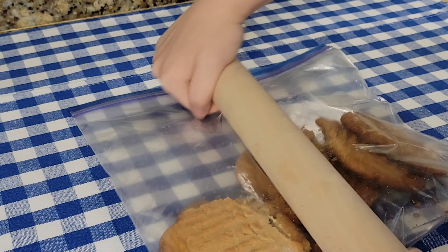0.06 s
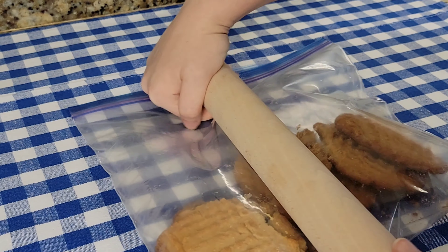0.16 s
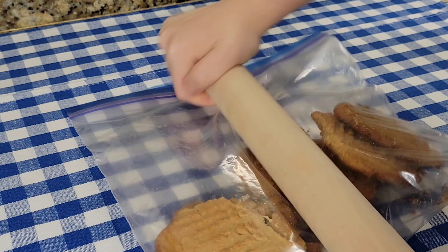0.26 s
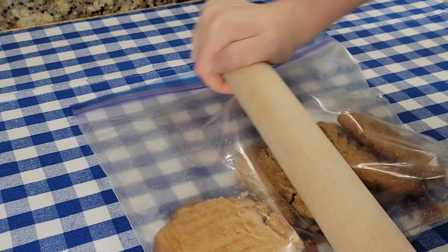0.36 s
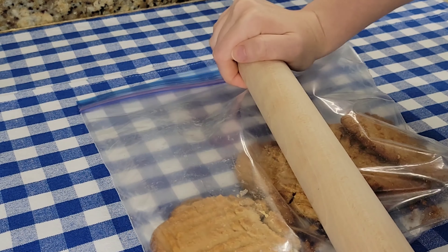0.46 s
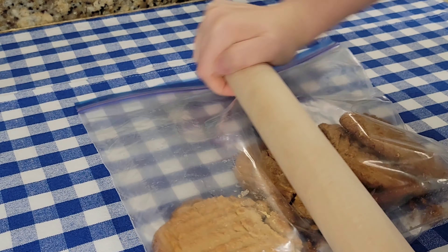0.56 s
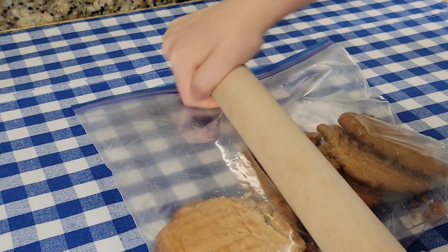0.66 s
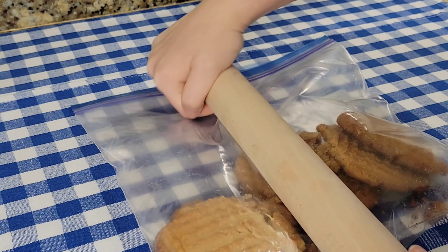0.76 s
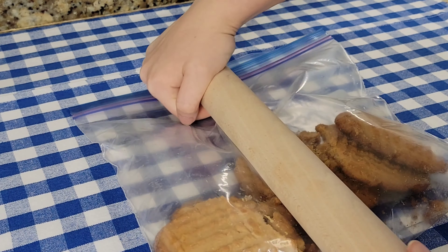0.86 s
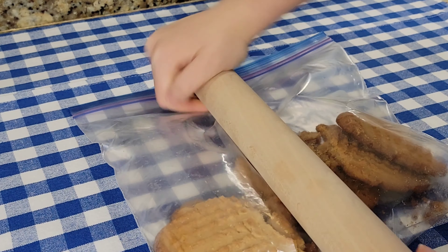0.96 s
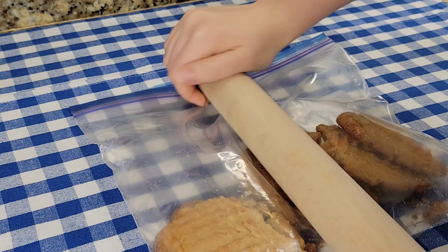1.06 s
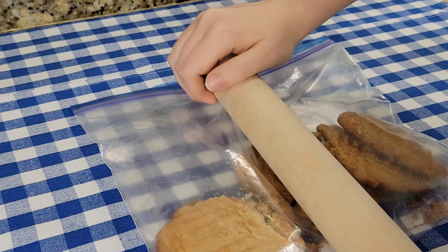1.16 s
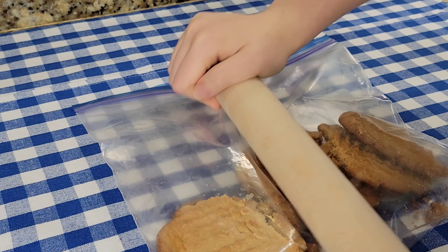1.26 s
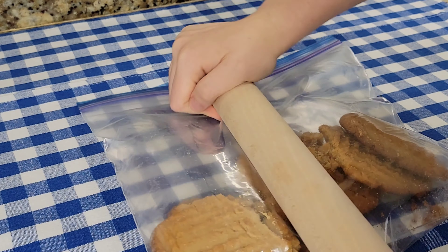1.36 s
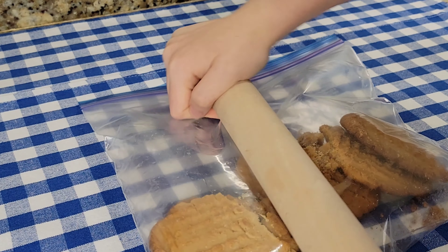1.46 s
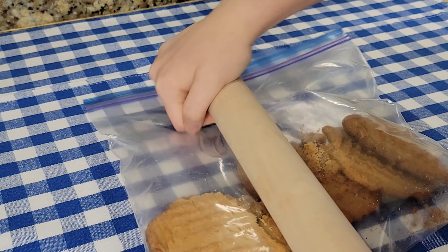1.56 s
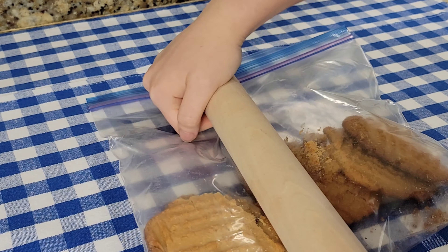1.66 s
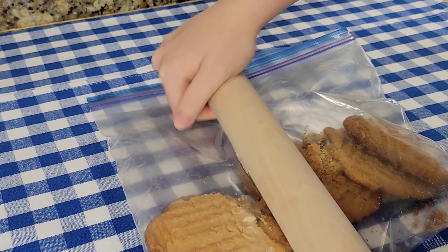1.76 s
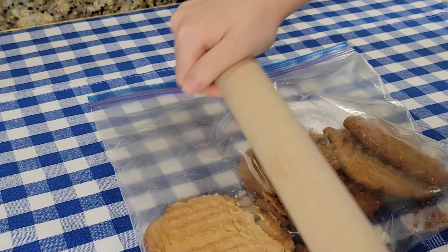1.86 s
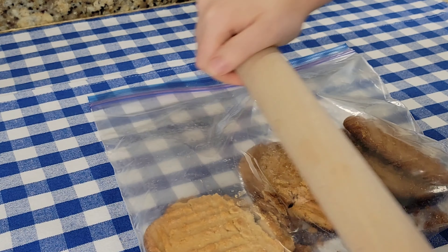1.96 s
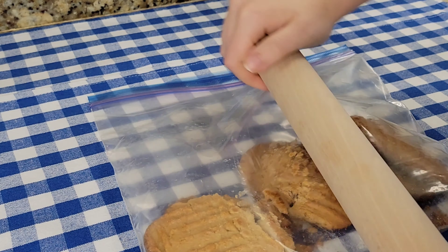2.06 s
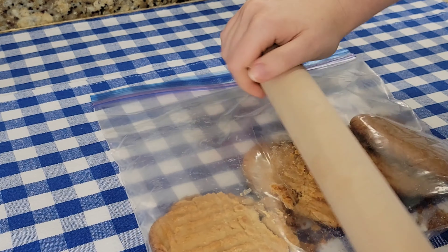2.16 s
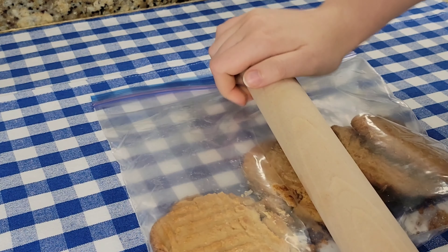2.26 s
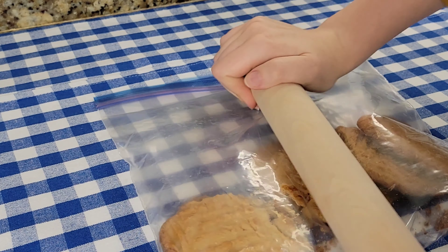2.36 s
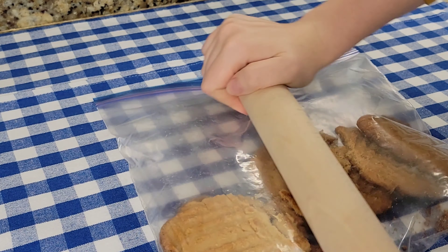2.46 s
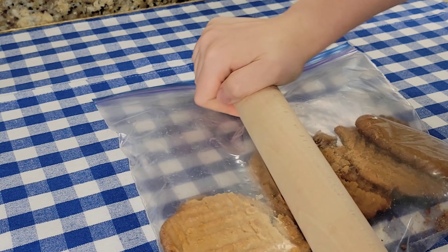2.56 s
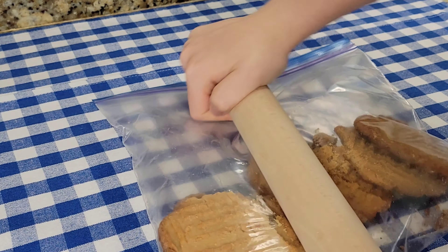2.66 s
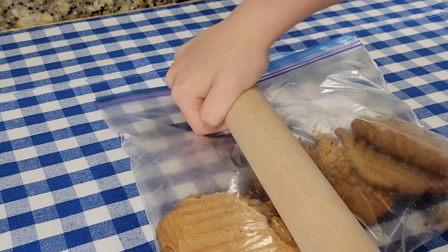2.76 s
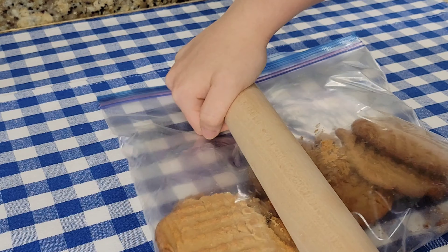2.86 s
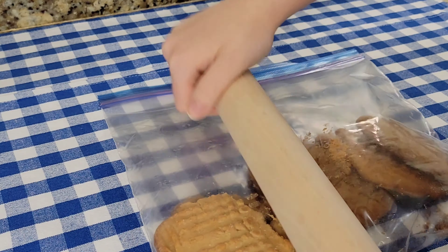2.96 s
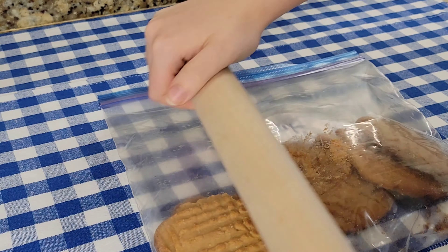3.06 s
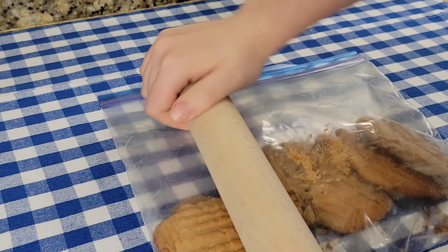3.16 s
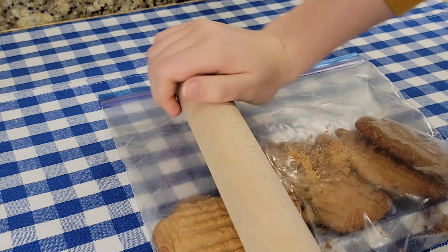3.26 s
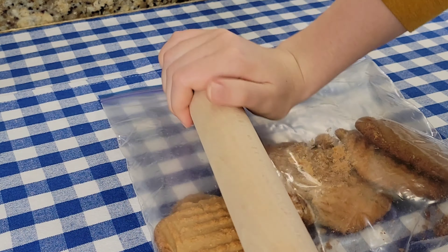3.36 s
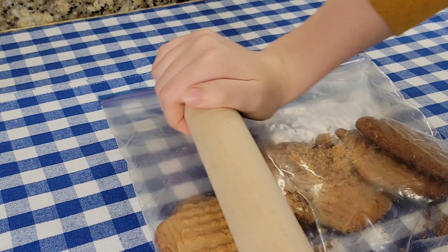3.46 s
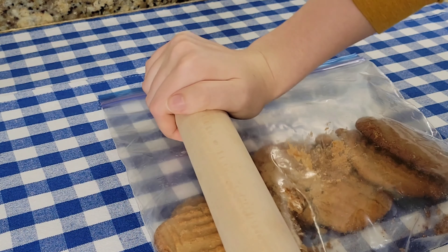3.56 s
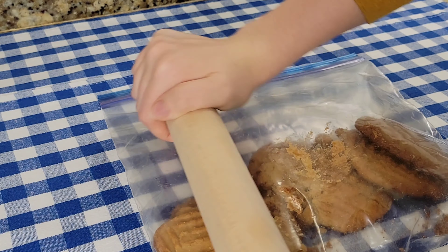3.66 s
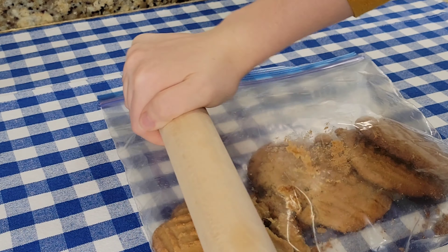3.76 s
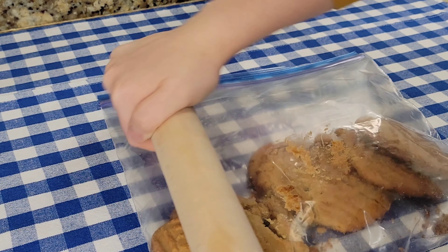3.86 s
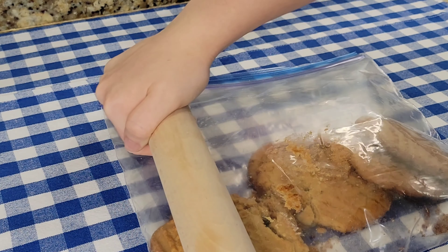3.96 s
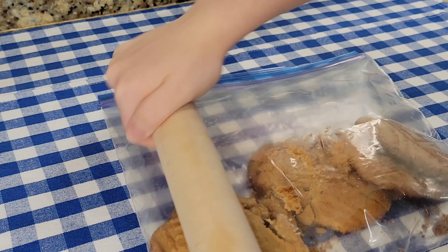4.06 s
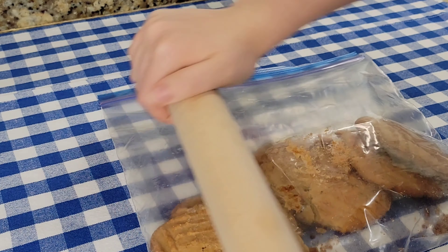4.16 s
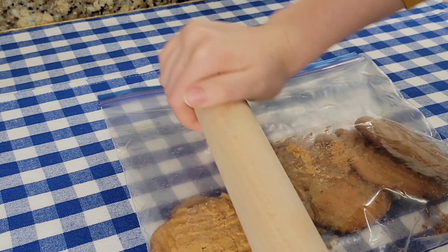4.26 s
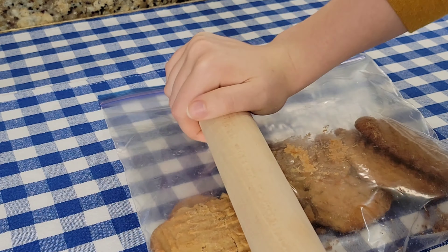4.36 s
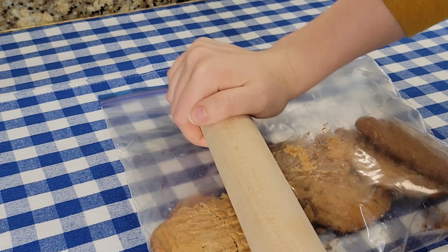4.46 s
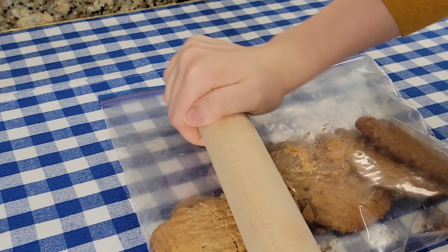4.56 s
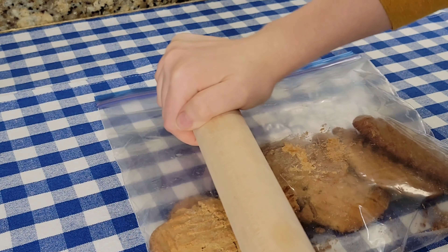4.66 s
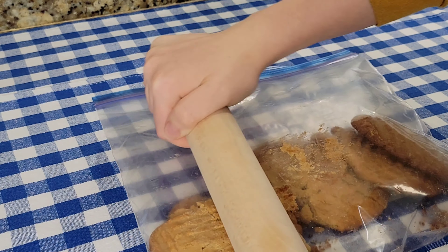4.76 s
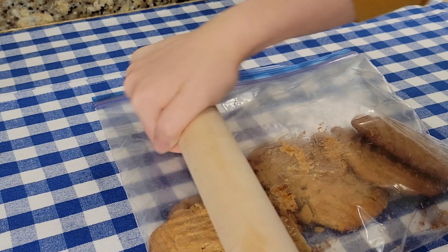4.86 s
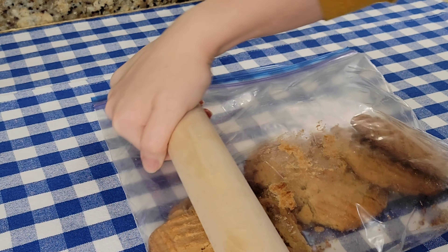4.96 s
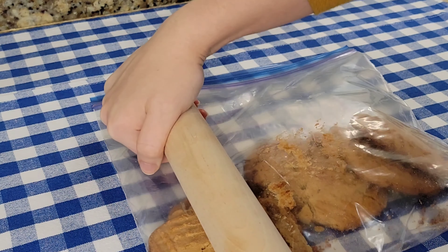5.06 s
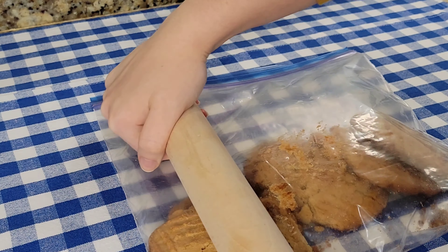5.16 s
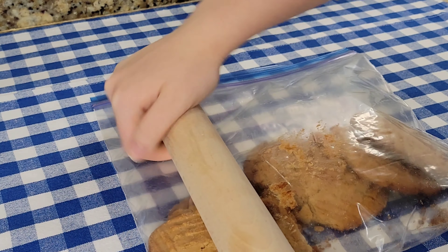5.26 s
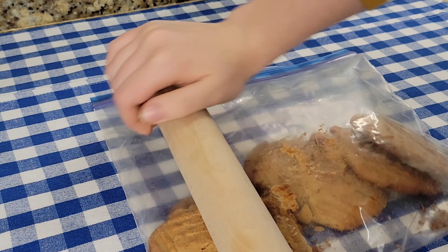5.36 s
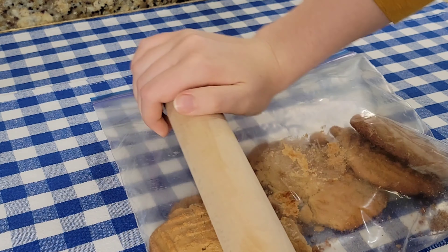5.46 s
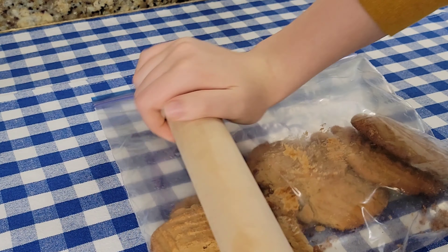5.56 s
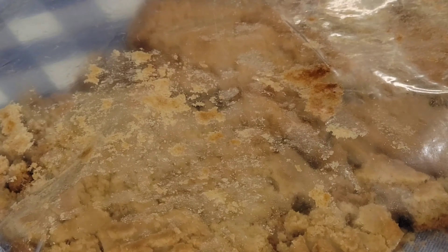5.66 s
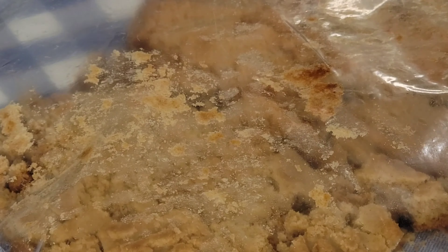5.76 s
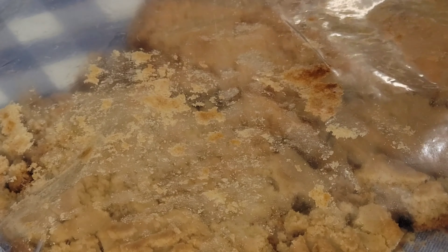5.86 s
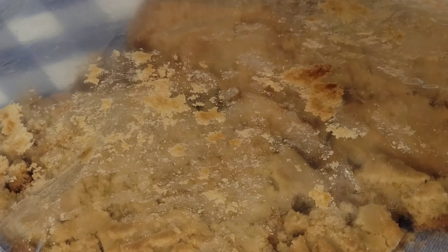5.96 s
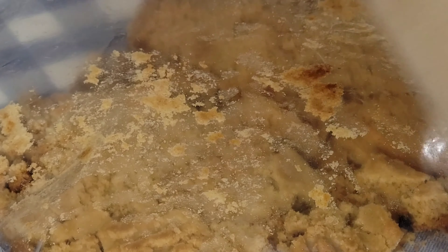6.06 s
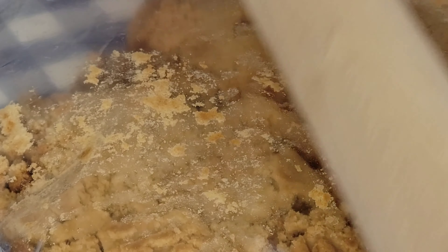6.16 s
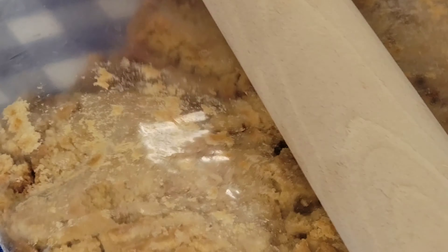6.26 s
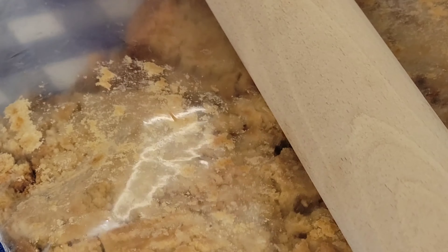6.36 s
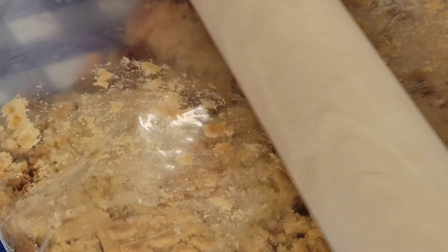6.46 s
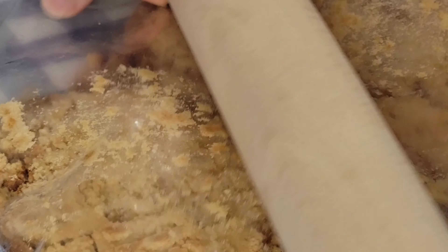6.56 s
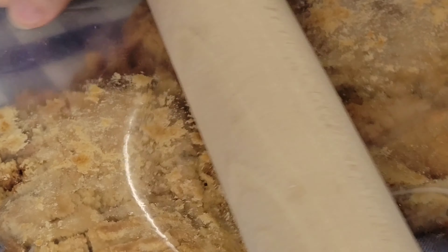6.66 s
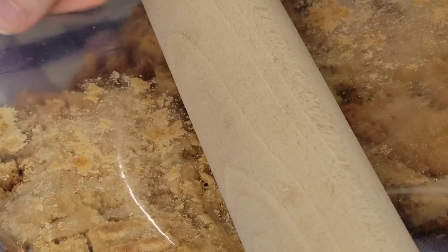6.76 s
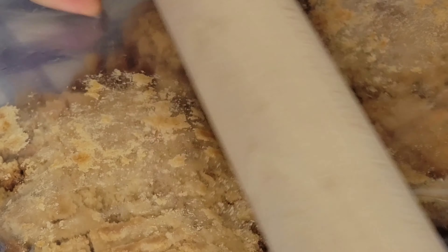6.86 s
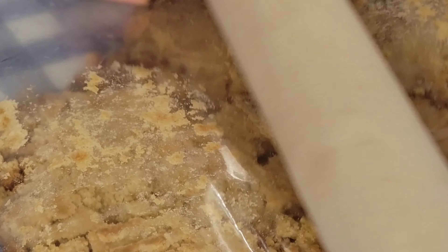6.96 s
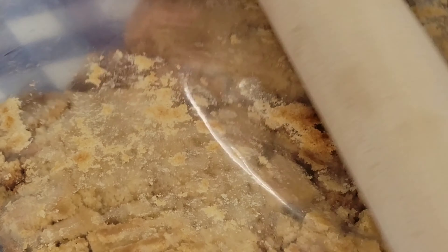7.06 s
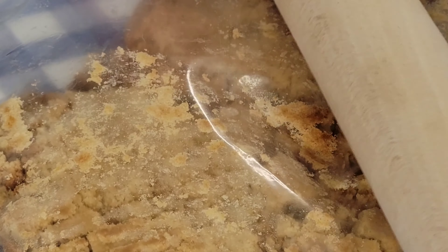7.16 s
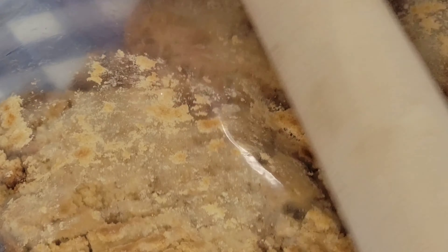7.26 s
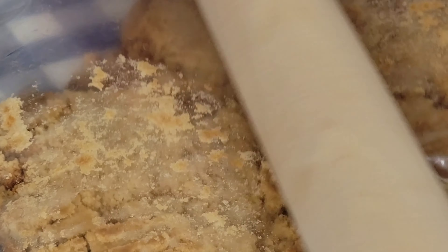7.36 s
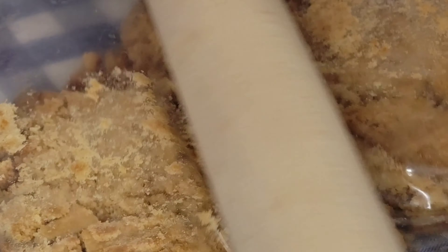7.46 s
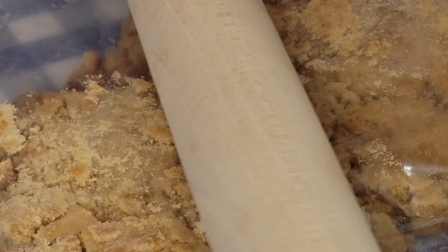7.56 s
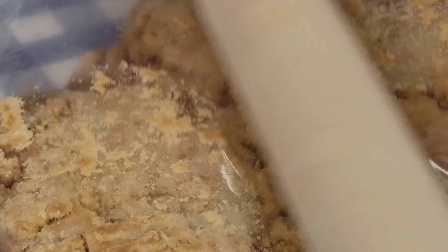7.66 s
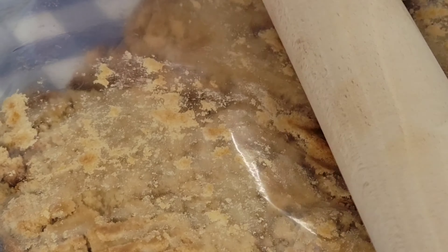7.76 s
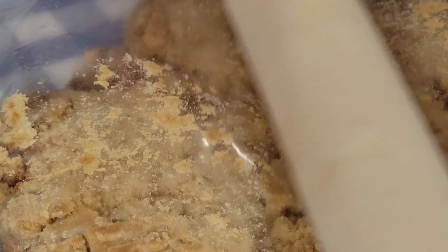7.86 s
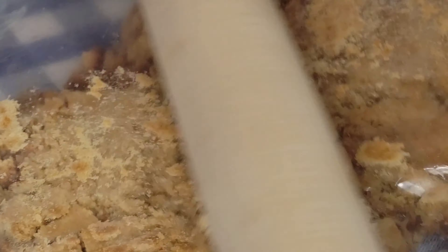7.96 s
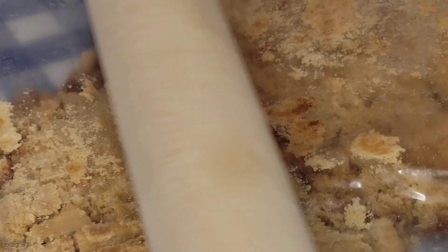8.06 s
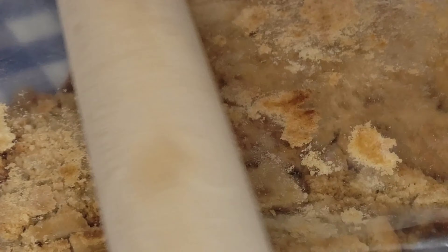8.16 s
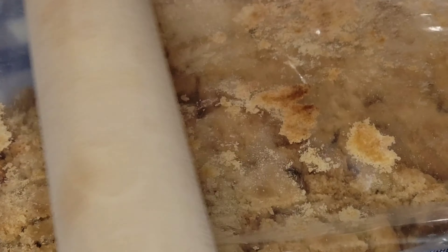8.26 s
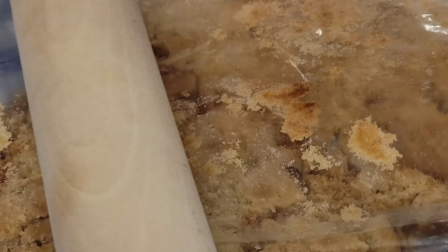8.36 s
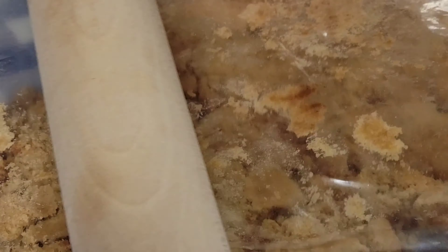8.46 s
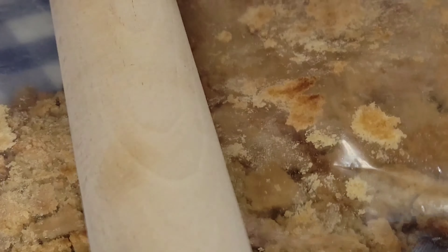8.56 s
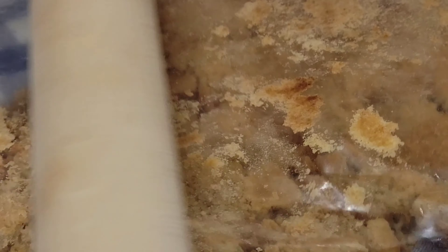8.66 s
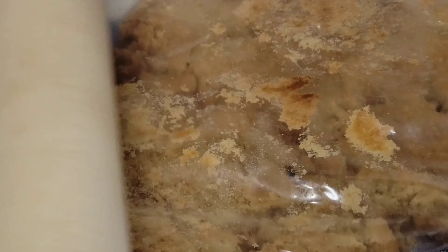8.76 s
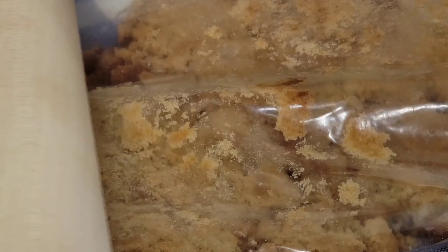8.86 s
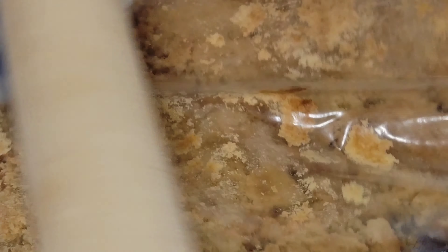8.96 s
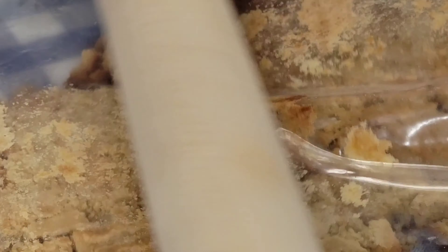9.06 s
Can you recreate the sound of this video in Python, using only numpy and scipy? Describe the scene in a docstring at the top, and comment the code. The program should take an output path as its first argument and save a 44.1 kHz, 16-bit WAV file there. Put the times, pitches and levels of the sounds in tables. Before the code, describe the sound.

A rolling pin crushes cookies inside a plastic bag, with dense crumbly crunches, bright film crinkle, sharp snaps and dull table thuds, close up.

```python
"""A rolling pin crushes cookies inside a plastic bag on a cloth-covered table, heard close up in stereo.
From the start, over a faint kitchen background, each push makes swarms of tiny clicks: dull for crumbs, bright
for film; filtered clicks make the table rumble, and short rings make it thud under the pin. Soon larger pieces
snap: a short ring, a tick and a spray of fragments. Later the bag also slides, with hiss and a wavering squeak.
Coarser crumbs rise in pitch towards the end. A small room answers with decaying noise."""
import sys
import numpy as np
from scipy import signal
from scipy.fft import rfft, irfft
from scipy.io import wavfile
from scipy.ndimage import uniform_filter1d, map_coordinates

SR = 44100
rng = np.random.default_rng(int(sys.argv[2]) if len(sys.argv) > 2 else 0)


def pcm_store(signal):
    """Save signal as 16-bit PCM."""
    levels = np.round(np.clip(np.atleast_2d(signal), -1, 1) * 32767)
    wavfile.write(sys.argv[1], SR, levels.astype(np.int16).T)


N = 401747
T = np.arange(N) / SR  # time of every sample, in seconds

# tone of the kitchen background: pitch_hz, level_db (relative)
KITCHEN_TONE = [(25, 12), (80, 1), (170, -11), (293, 2), (440, -14.5), (1100, -11.5), (1700, -22),
                (3250, -15), (8000, -28.5), (16000, -43)]
# pushes of the pin into the cookies: full_weight_s, swell_s, hold_s, crunch_db, crinkle_db, rumble_db
PIN_PUSHES = [(0.006, 0.034, 0.27, -49, -50.5, -43.5), (0.213, 0.053, 0.22, -50, -54, -49.5),
              (0.416, 0.038, 0.008, -60, -63, -48), (0.562, 0.105, 0.2, -52.8, -56, -52.5),
              (0.912, 0.15, 0.23, -61.5, -61.5, -70.5), (1.293, 0.11, 0.11, -54, -54, -57.5),
              (1.432, 0.014, 0.14, -45, -48, -41), (1.718, 0.1, 0.13, -59, -67, -71),
              (2.075, 0.031, 0.039, -48, -55, -59.0), (2.185, 0.029, 0.014, -54, -53.5, -71),
              (2.348, 0.31, 0.12, -56.5, -59, -74), (2.475, 0.08, 0.22, -54, -54.5, -45),
              (2.614, 0.032, 0.11, -51.5, -54, -51), (2.837, 0.026, 0.042, -52.5, -60, -66.5),
              (3.2, 0.08, 0.19, -63, -68.5, -66.5), (3.476, 0.17, 0.14, -58, -57.5, -57.5),
              (3.693, 0.037, 0.031, -47, -49, -34.5), (3.799, 0.16, 0.044, -45.5, -47.5, -40.5),
              (4.017, 0.025, 0.035, -60.5, -70, -69.0), (4.479, 0.16, 0.096, -54.5, -54.5, -52.0),
              (4.687, 0.021, 0.0059, -43, -43.5, -39.5), (4.817, 0.14, 0.15, -51.5, -51.5, -50),
              (5.22, 0.29, 0.09, -65.5, -67.5, -80), (5.387, 0.022, 0.14, -63, -73, -63),
              (5.588, 0.05, 0.027, -61.8, -60, -83), (5.885, 0.17, 0.076, -76, -60.5, -91),
              (6.183, 0.016, 0.012, -55.5, -54.5, -75), (6.333, 0.13, 0.15, -50.5, -56.5, -48),
              (6.554, 0.17, 0.065, -39, -43.5, -39.5), (6.902, 0.14, 0.14, -44.5, -48.5, -52.5),
              (7.224, 0.1, 0.037, -43, -55, -46.5), (7.299, 0.084, 0.053, -39, -44, -43.5),
              (7.449, 0.099, 0.045, -40.5, -47, -50), (7.644, 0.1, 0.041, -36, -40.5, -45),
              (7.778, 0.036, 0.11, -46, -47, -48), (7.966, 0.11, 0.073, -39.5, -44.5, -49.5),
              (8.115, 0.072, 0.088, -47.8, -51, -58), (8.242, 0.055, 0.031, -49, -50, -48.5),
              (8.348, 0.04, 0.063, -62, -61, -76), (8.513, 0.11, 0.032, -46, -54.5, -40),
              (8.675, 0.056, 0.086, -40, -44, -47), (8.986, 0.23, 0.088, -40, -42.3, -47)]
# a whole chunk caves in at once: peak_s, crunch_db, crinkle_db
CHUNK_COLLAPSES = [(0.225, -37.5, -44), (0.34, -43.5, -42.5), (0.544, -56, -55), (0.733, -42.5, -48),
                   (0.798, -44.8, -45), (2.106, -50, -51), (2.415, -60, -47), (2.621, -45, -44),
                   (2.767, -42, -50), (3.144, -41.5, -44.5), (3.688, -38, -40.5), (4.3, -45.5, -49),
                   (4.836, -43, -41.5), (4.93, -54.8, -42), (6.243, -34, -44.5), (6.571, -35, -51.5),
                   (8.131, -44.5, -34.0), (8.431, -38, -52)]
# tone of the fine crumb crunch: pitch_hz, level_db (relative)
CRUMB_TONE = [(150, -12), (260, 0.5), (520, 0.5), (750, -3), (1100, 0), (1500, -2.5), (2000, 1),
              (2500, -3.5), (3200, 0.5), (4000, -11), (5000, -9.5), (9000, -49)]
# tone of the fine film crinkle: pitch_hz, level_db (relative)
FILM_TONE = [(1200, -17.5), (2500, -3), (3300, -2.5), (4200, -7), (5200, -4.5), (7000, -2.5), (8500, -7.5),
             (10500, -11), (12500, -7.5), (16000, -11)]
# ringing of the table with the pin on it: pitch_hz, level_db (relative), fade_s (to fall by 60 dB)
TABLE_MODES = [(67.9, -3.5, 0.35), (78, -39, 0.083), (97.1, 1.5, 0.27), (122.8, -9, 0.68), (151.9, 6, 0.18),
               (185.2, 2, 0.13), (237.3, -7.5, 0.27), (280.8, 1.5, 0.073), (310, -11, 0.13),
               (344, -6.5, 0.15), (456, -41, 0.051), (484, -6, 0.19), (588, -8.5, 0.084)]
# how firmly the pin meets the table: time_s, firm_db (firm contact over cushioned contact)
PIN_FIRMNESS = [(0, -18), (0.4, -3.5), (1.5, 4), (2.5, -6), (3.7, -9), (4.4, -1), (4.8, -1), (5.5, 10),
                (6.6, -9), (7.0, 5), (8.1, 19), (8.55, 18), (9.1, -1)]
# the pin drops onto the table: start_s, level_db, pitch_hz (most excited), pin_db (ring of the pin, relative)
PIN_DROPS = [(.01, -28, 68.4, -50), (0.086, -33, 71.5, -50), (3.161, -40.5, 65, -50),
             (3.685, -22.5, 80, -50), (3.718, -25.5, 64, -50), (3.833, -30, 153, -50),
             (4.305, -34.5, 63, -50), (4.333, -36.5, 62.5, -50), (4.691, -37, 138, -50),
             (4.706, -27, 93, -52), (4.835, -34.5, 150, -50), (5.454, -44, 70, -50),
             (6.262, -29.5, 63.6, -50), (6.571, -29, 69, -27), (7.666, -13.5, 330, -44),
             (7.685, -23, 155, -50), (7.71, -26, 69.4, -50), (8.426, -15.5, 346, -25.5),
             (8.467, -21.5, 174, -47), (8.534, -23.5, 96, -50)]
# bending of the wooden pin: pitch_hz, level_db (relative), fade_s (to fall by 60 dB)
PIN_MODES = [(762, 5.5, 0.32)]
# single pieces and creases that snap: start_s, peak_db (before the room), pitch_hz, treble_db (tick, relative)
SINGLE_SNAPS = [(0.103, -26, 1380, -22), (0.153, -30, 850, -30), (0.1885, -28.5, 3120, -28),
                (0.3351, -22, 2780, -5.5), (0.3459, -21.5, 3040, -8), (0.5535, -29.5, 4600, -30),
                (0.6199, -37, 1190, -25), (0.66, -36, 695, -28), (0.699, -35, 690, -30),
                (0.7274, -21.5, 2120, -12), (0.7466, -24, 2110, -34), (0.8017, -27.5, 3580, -24),
                (1.108, -39.5, 1420, -22), (1.1394, -33.5, 1380, -31), (1.226, -36.5, 1490, -36),
                (1.2632, -35, 2020, -15), (1.3016, -29, 1390, -16), (1.4657, -23, 2340, -10),
                (1.6193, -31.5, 2220, -28), (1.8099, -32.5, 1590, -20), (1.8475, -41, 1360, -13),
                (2.1186, -26, 1070, -6), (2.3589, -38, 1840, -24), (2.4192, -27.5, 2480, -11),
                (2.639, -25, 2530, -20), (2.7266, -28.5, 1860, -26), (2.752, -23, 1330, -34),
                (2.7672, -18.5, 2380, -13), (2.8647, -29, 1850, -21), (3.133, -34.5, 1110, -26),
                (3.1464, -23.5, 2190, -5.5), (3.2727, -42, 1180, -41), (3.3026, -38.5, 850, -32),
                (3.4343, -38.5, 3940, -22), (3.4804, -25.5, 3550, -7.5), (3.6843, -21, 2920, -16),
                (3.8072, -26, 2400, -24), (3.8342, -24, 3180, -10), (4.0321, -35.5, 2140, -19),
                (4.0738, -39.5, 2320, -36), (4.286, -36, 700, -34), (4.301, -31, 2190, -22),
                (4.4614, -31, 2760, -8.5), (4.5701, -33.5, 1290, -20), (4.7767, -23.5, 2640, -34),
                (4.8176, -27, 2140, -24), (4.907, -27, 1930, -28), (4.9295, -19, 3500, -3),
                (5.1286, -46.5, 1520, -21), (5.2495, -37, 3800, -11), (5.3007, -45, 2760, -28),
                (5.4126, -32.5, 1870, -36), (5.426, -34, 1720, -36), (5.595, -43.5, 686, -20),
                (5.6477, -38.5, 4310, -30), (6.238, -23.5, 1500, -22), (6.2457, -24, 1780, -20),
                (6.362, -32, 1400, -20), (6.4978, -28.5, 2030, -24), (6.512, -23, 1290, -24),
                (6.5354, -17.5, 2240, -26), (6.544, -18, 1300, -24), (6.5699, -17, 1460, -32),
                (6.6557, -26.5, 3940, -31), (7.0494, -17, 3340, -22), (7.4251, -25.5, 1760, -25),
                (7.4492, -25, 1360, -24), (7.868, -18.5, 1960, -30), (7.9778, -18.5, 1510, -15),
                (8.1184, -21.5, 2200, -7), (8.1314, -11, 2800, -13.5), (8.163, -27, 1800, -27),
                (8.336, -42, 3500, -17), (8.388, -38, 2600, -26), (8.4155, -33.5, 1620, -17),
                (8.441, -27, 3000, -23), (8.5267, -24, 2000, -14), (8.553, -31, 1680, -30),
                (8.6599, -19, 1740, -16), (9.0825, -19.5, 1260, -23)]
# the bag slides on the cloth, singing when free and only rasping under the pin:
# full_speed_s, swell_s, hold_s, level_db, purity_db (squeak over hiss)
BAG_SLIDES = [(5.679, .02, .03, -63, -25), (5.77, 0.032, 0.013, -70, 3), (5.888, 0.025, 0.02, -52.5, -12),
              (5.962, 0.012, 0.0071, -55.5, 4), (6.012, 0.037, 0.012, -50.5, 12),
              (6.067, .04, 0.11, -73, -12), (7.298, 0.18, 0.035, -44, -18), (8.696, 0.047, 0.022, -47, -18)]
# resonances of the sliding film: pitch_hz, width_hz, level_db (relative); the first is also the squeak's pitch
FILM_RESONANCES = [(1975, 180, -9.5), (3380, 520, -10.5), (5900, 4600, -10)]
# the two ports of the microphone differ in tone: pitch_hz, level_db (left over right)
PORT_TONES = [(250, -1.5), (1000, .5), (4000, 0.9), (8000, 2), (12500, -1.5)]

KITCHEN_DB = -67.5
SWELL_DB, RELEASE_DB_PER_S = 23.5, 194  # growth over one swell; fall once the hand lets up
COLLAPSE_RISE_DB_PER_S, COLLAPSE_FALL_DB_PER_S = 1102, 436
SLIDE_STOP_DB_PER_S = 380
SPURTS_PER_S, SPURT_DB, SPURT_FADE_S = 45, 3.0, 0.011  # one break sets off its neighbours
FINER = 1.72  # pieces are ground smaller: coarse crumbs rise in pitch by this factor from start to end
ROOM_T60_S, ROOM_TREBLE_T60_S = 0.21, 0.14  # time to fall by 60 dB
TOP_HZ = 15950  # upper limit of the recorder


def undb(db):
    """Turn decibels into a gain."""
    return 10 ** (np.asarray(db) / 20)


def unit(x):
    """Scale a sound to an average (rms) level of 1."""
    return x / np.sqrt(np.mean(x ** 2))


def high_pass(x, hz, order=1):
    """Weaken what lies below hz."""
    return signal.sosfilt(signal.butter(order, hz, "high", fs=SR, output="sos"), x)


def soften(x, hz):
    """Weaken what lies above hz, as a cushioned contact does."""
    return signal.sosfilt(signal.butter(2, hz, fs=SR, output="sos"), x)


def band(x, hz, width_hz):
    """One resonance that leaves its centre pitch at full strength."""
    hz, width_hz = min(hz, .45 * SR), min(width_hz, .4 * SR)
    return signal.lfilter(*signal.iirpeak(hz, hz / width_hz, fs=SR), x)


def colour(x, points, size=2048):
    """Shape the tone by (Hz, dB) points without any sound ahead of a click, so its front stays sharp."""
    hz, db = np.transpose(points)
    bins_hz = np.arange(size // 2 + 1) * SR / size
    gain_db = np.interp(np.log(bins_hz + 1), np.log(hz), db)
    # folding the cepstrum forward in time gives a minimum-phase filter
    cepstrum = irfft(np.log(undb(gain_db)))
    cepstrum[1:size // 2] *= 2
    cepstrum[size // 2 + 1:] = 0
    answer = irfft(np.exp(rfft(cepstrum)))
    return signal.oaconvolve(x, answer[None], axes=-1)[:, :N]


def add(out, start_s, sound):
    """Mix a sound in at its start time."""
    i = max(int(start_s * SR), 0)
    out[..., i:i + sound.shape[-1]] += sound[..., :max(N - i, 0)]


def place(x, side):
    """A spot left (+) or right (-) of centre reaches one port earlier and louder."""
    lag = int(round(side * 2.4))  # in samples
    ports = np.array([x, np.roll(x, lag)])
    return ports * undb(np.array([[1], [-1]]) * side * 1.6)


def ring_of(modes):
    """A struck body answers one sharp push with fading tones."""
    t = T[:SR // 2]
    return sum(undb(level_db - 60 * t / fade_s) * np.sin(2 * np.pi * hz * t)
               for hz, level_db, fade_s in modes)


def clicks(rate, spread_db, even_s):
    """Random tiny breaks, mostly small and a few large, with their power evened out over even_s."""
    size = undb(spread_db * np.minimum(rng.exponential(size=N), 5))
    size *= rng.choice([-1, 1], N)
    x = size * (rng.random(N) < rate / SR)
    power = uniform_filter1d(x ** 2, int(even_s * SR) + 1)
    return x / np.sqrt(np.abs(power) + np.mean(power) / 10)


def swarm(pitches, rate, spread_db, even_s):
    """Breaks of several sizes, each with its own pitch, on both sides of the bag."""
    out = np.zeros((2, N))
    for hz in pitches:
        for side in (-1, 1):
            grains = band(clicks(rate, spread_db, even_s), hz, hz * 1.4)
            out += place(grains, side * rng.uniform(0.1, 1))
    return out


def pops(db, count, low_hz, span, lift_db, rise=1):
    """Coarser breaks, each a short ring; pitches go from low_hz to span times that, all rising over time."""
    out, t = np.zeros((2, N)), T[:SR // 80]
    for when, size, tone, length, side in rng.random((count, 5)):
        hz = low_hz * span ** tone * rise ** when
        ring = np.sin(2 * np.pi * hz * t) * np.exp(-t * hz / (1 + 2 * length))
        level_db = db[int(when * N)] + lift_db + 12 * size ** 2
        add(out, when * N / SR, place(ring, 2 * side - 1) * undb(level_db))
    return out


def drift(rate):
    """A smooth random course between 0 and 1, with rate new targets per second."""
    steps = np.arange(0, N / SR + 1, 1 / rate)
    course = np.interp(T, steps, rng.random(200)[:len(steps)])
    return uniform_filter1d(course, SR // 30)


def folds(x, share):
    """Pin and bag folds reflect from close by; as they move, the echo delays and the tone keep shifting."""
    echoes = []
    for port in x:
        lags = [(0.00021 + 0.001617 * drift(rate=7)) * SR for _ in range(2)]
        first, second = (map_coordinates(port, [np.arange(N) - lag], order=3) for lag in lags)
        echoes.append(first - second)
    return x + share * np.array(echoes)


def stroke(full_s, swell_s, hold_s, fall_db_per_s):
    """Course of one hand movement in dB: it swells up to full_s, holds, and dies away."""
    swell_db = np.minimum(SWELL_DB * (T - full_s) / swell_s, 0)
    return swell_db - fall_db_per_s * np.maximum(T - full_s - hold_s, 0)


def together(courses):
    """Level in dB of overlapping movements, whose powers add."""
    power = np.full(N, 1e-12)
    for db in courses:
        heard = db > -110
        power[heard] += undb(db[heard]) ** 2
    return 10 * np.log10(power)


def air():
    """Faint kitchen background of shaped noise, alike on both sides in the bass."""
    mid, side = rng.standard_normal((2, N))
    side = high_pass(side, 700)
    noise = np.array([mid + 0.85 * side, mid - 2.0 * side])
    return unit(colour(noise, KITCHEN_TONE)) * undb(KITCHEN_DB)


def crushing():
    """Crunch, crinkle and rumble in dB: pushes drive all three, a collapsing chunk only crumbs and film."""
    pushes = [(stroke(full_s, swell_s, hold_s, RELEASE_DB_PER_S), levels_db)
              for full_s, swell_s, hold_s, *levels_db in PIN_PUSHES]
    collapses = []
    for peak_s, *levels_db in CHUNK_COLLAPSES:
        course = np.minimum(COLLAPSE_RISE_DB_PER_S * (T - peak_s), COLLAPSE_FALL_DB_PER_S * (peak_s - T))
        collapses.append((course, levels_db))
    causes = pushes + collapses, pushes + collapses, pushes
    return [together(course + levels_db[k] for course, levels_db in events)
            for k, events in enumerate(causes)]


def spurts():
    """Crumbs give way in little avalanches: sudden lifts in dB that fade at once."""
    starts = (rng.random(N) < SPURTS_PER_S / SR) * rng.exponential(size=N).clip(0, 2)
    db = SPURT_DB * signal.lfilter([1], [1, -np.exp(-1 / (SPURT_FADE_S * SR))], starts)
    return db - 10 * np.log10(np.mean(undb(db) ** 2))  # keep the average power


def crumbs(db):
    """Dull, dense crunch of cookie giving way under the pin, with coarser crumbs on top."""
    grains = swarm((490, 1070, 1720, 2900), rate=480, spread_db=2.5, even_s=0.062)
    fine = unit(colour(folds(grains, share=.55), CRUMB_TONE)) * undb(db)
    return fine + pops(db, count=520, low_hz=754, span=2.99, lift_db=4.5, rise=FINER)


def film(db):
    """Creases in the bag flip over in fine, bright ticks, a few of them larger."""
    grains = swarm((4500, 10000), rate=1600, spread_db=2.5, even_s=0.16)
    fine = unit(colour(folds(grains, share=.5), FILM_TONE)) * undb(db)
    return fine + pops(db, count=330, low_hz=4050, span=1.76, lift_db=-3.0)


def contact(hz, width_hz):
    """Bumps of the pin, narrowed to the pitches of one kind of contact, set the table ringing."""
    bumps = band(clicks(rate=360, spread_db=2.5, even_s=0.037), hz, width_hz)
    return unit(signal.oaconvolve(bumps, ring_of(TABLE_MODES))[:N])


def table(load_db, firm_db):
    """The pin bumps over crumbs all along a stroke, and now and then drops off a piece."""
    cushioned, firm = contact(68, 72), contact(165, 143)
    rumble = (cushioned + undb(firm_db) * firm) / np.hypot(1, undb(firm_db))
    # the hand presses on steadily
    rumble /= np.sqrt(uniform_filter1d(rumble ** 2, SR // 14) + 1 / 20)
    out = rumble * undb(load_db)
    for start_s, level_db, hz, pin_db in PIN_DROPS:
        thud = soften(band(ring_of(TABLE_MODES), hz, hz * 0.5), hz * 2.13)
        thud = thud / np.abs(thud).max() + undb(pin_db) * ring_of(PIN_MODES)
        add(out, start_s, thud * undb(level_db))
    return place(out, 0.59)


def room(x, near_db, wet_db):
    """Quick treble reflections from the sides, then the kitchen, whose treble dies sooner."""
    t = T[:SR // 2]
    noise = rng.standard_normal((2, len(t)))
    low = soften(noise, hz=2820)
    tail = low * undb(-60 * t / ROOM_T60_S) + (noise - low) * undb(-60 * t / ROOM_TREBLE_T60_S)
    tail = high_pass(tail * (t > .005), 250)
    near = high_pass(rng.standard_normal(len(t)) * np.exp(-t / 0.035), 1800)
    near = unit(near) * np.array([[1], [-1]])  # opposite sign in the two ports
    answer = (undb(near_db) * near + undb(wet_db) * unit(tail)) / np.sqrt(len(t))
    return signal.oaconvolve(x.mean(axis=0)[None], answer, axes=-1)[:, :N]


def snaps():
    """Larger breaks: each a ring of a cycle or two, a sharp tick, and a spray of fragments."""
    out, t = np.zeros((2, N)), T[:SR // 20]
    impulse = 1. * (t == 0)
    tick = band(impulse, 5450, 4000)
    for start_s, peak_db, hz, treble_db in SINGLE_SNAPS:
        cycles = t * hz
        ring = np.sin(2 * np.pi * cycles) * cycles * np.exp(-cycles / 0.37)
        crack = ring / np.abs(ring).max() + undb(treble_db + 18) * tick
        # noise partly shared by both sides repeats the crack as fragments
        fragments = rng.standard_normal((2, len(t))) + rng.standard_normal(len(t))
        spray = fragments * np.exp(-t / .004) * undb(-29)
        ports = place(impulse, rng.uniform(0, 0.12))[::rng.choice([-1, 1])]
        sound = signal.fftconvolve(ports + spray, crack[None], axes=-1)
        add(out, start_s, sound / np.abs(sound).max() * undb(peak_db))
    return out


def slide():
    """Film sticks and slips fast on cloth: a wavering squeak amid the hiss of a few resonances."""
    slips = clicks(rate=3500, spread_db=1.0, even_s=0.007)
    hiss = np.zeros(N)
    for hz, width_hz, level_db in FILM_RESONANCES:
        hiss += undb(level_db) * unit(band(band(slips, hz, width_hz), hz, width_hz))
    hiss = unit(hiss)
    waver_hz = 25 * unit(soften(rng.standard_normal(N), hz=70))
    squeak_hz = FILM_RESONANCES[0][0] + waver_hz
    squeak = unit(np.sin(2 * np.pi * np.cumsum(squeak_hz) / SR))
    out = np.zeros(N)
    for full_s, swell_s, hold_s, level_db, purity_db in BAG_SLIDES:
        purity = undb(purity_db)
        course_db = level_db + stroke(full_s, swell_s, hold_s, SLIDE_STOP_DB_PER_S)
        mix = (purity * squeak + hiss) / np.hypot(1, purity)
        out += mix * undb(np.maximum(course_db, -140))
    return place(out, .1)


def scene():
    """Bag, cookies and table in a quiet kitchen."""
    background = air()
    crunch_db, crinkle_db, rumble_db = crushing()
    spurt_db = spurts()
    firm_db = np.interp(T, *np.transpose(PIN_FIRMNESS))
    bag = crumbs(crunch_db + spurt_db) + film(crinkle_db + 1.07 * spurt_db)
    dry = bag + table(rumble_db, firm_db) + snaps() + slide()
    return dry + room(dry, near_db=-8.5, wet_db=-8) + background


def record(dry):
    """Each port has its own tone; the recorder drops the deepest bass and cuts the top."""
    ports = []
    for port, side in zip(dry, (1, -1)):
        tone = [(hz, side * db / 2) for hz, db in PORT_TONES]
        ports.append(colour(port[None], tone))
    x = high_pass(np.vstack(ports), 46, order=4)
    return signal.sosfilt(signal.ellip(10, .2, 70, TOP_HZ, fs=SR, output="sos"), x)


dry = scene()
out = record(dry)
pcm_store(out)
```